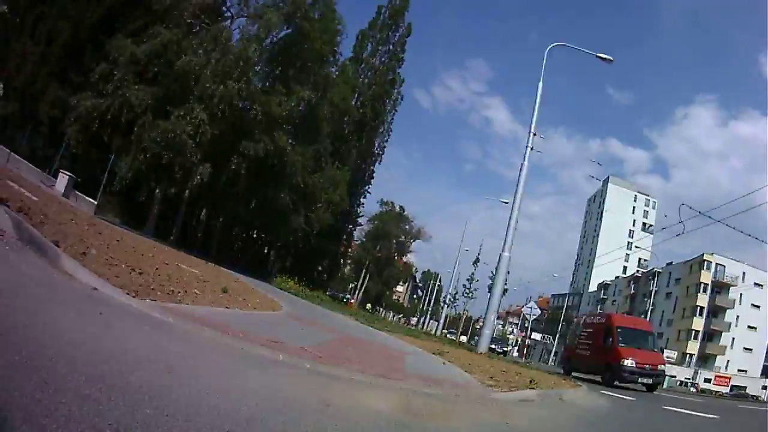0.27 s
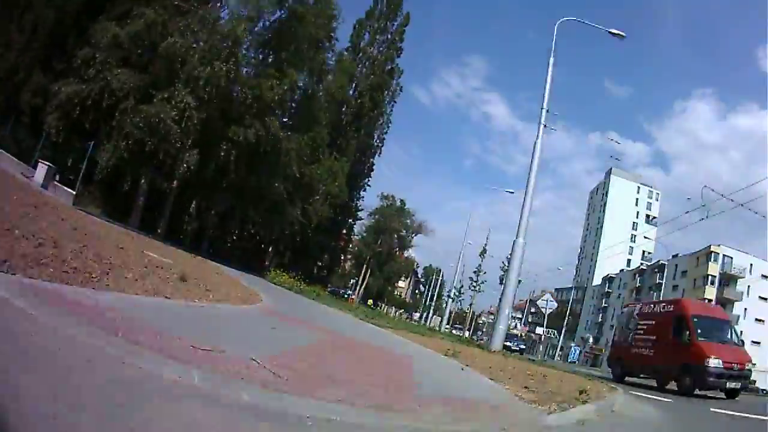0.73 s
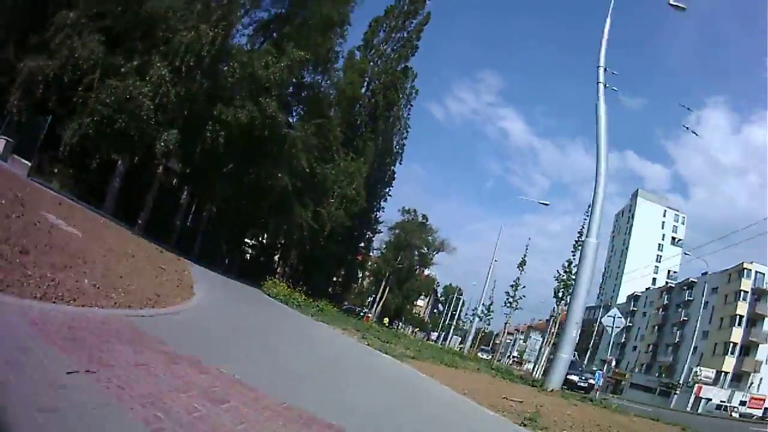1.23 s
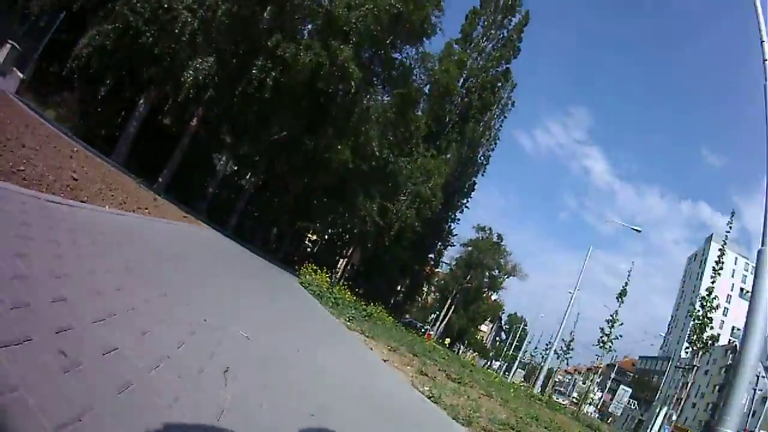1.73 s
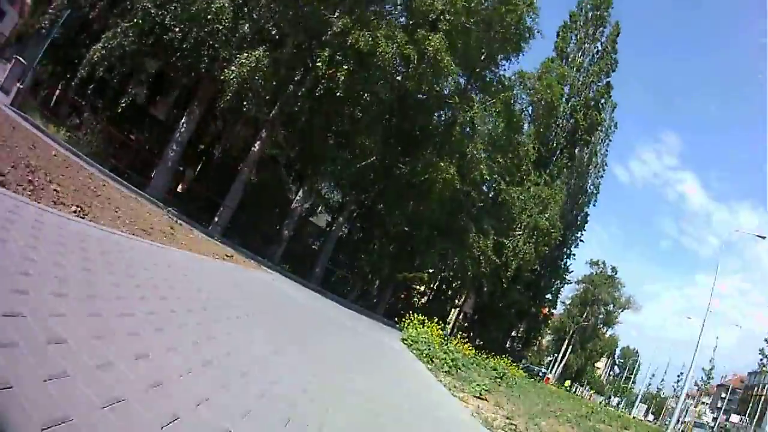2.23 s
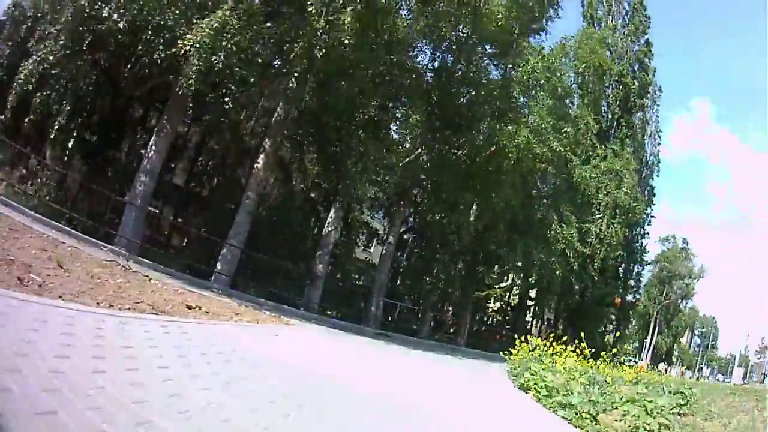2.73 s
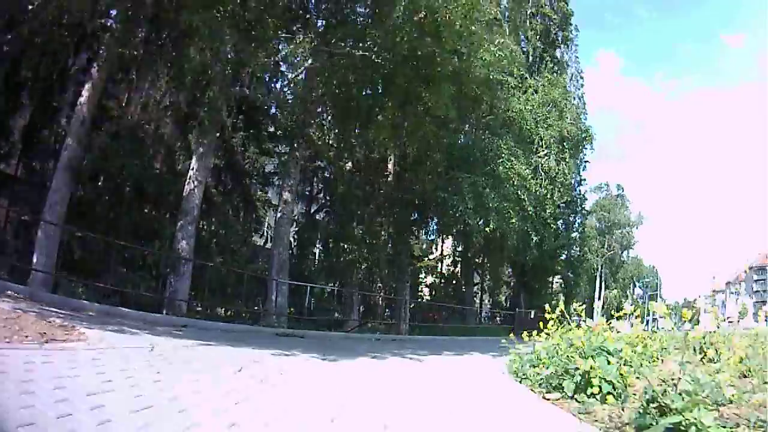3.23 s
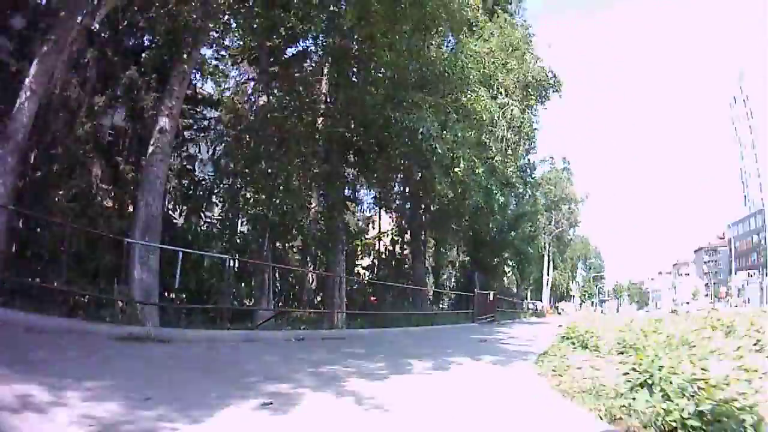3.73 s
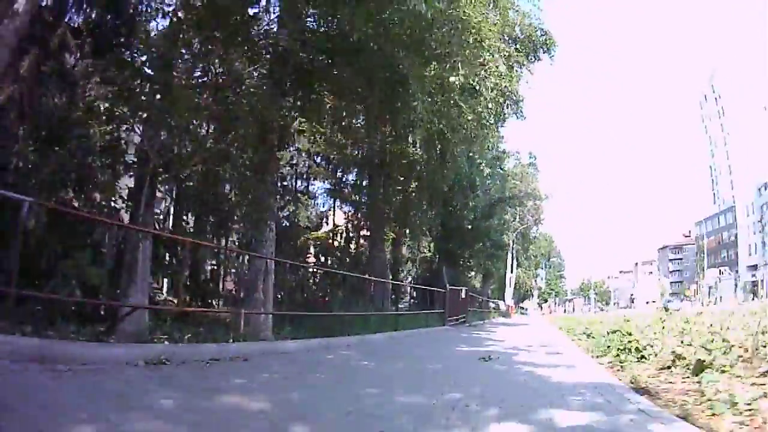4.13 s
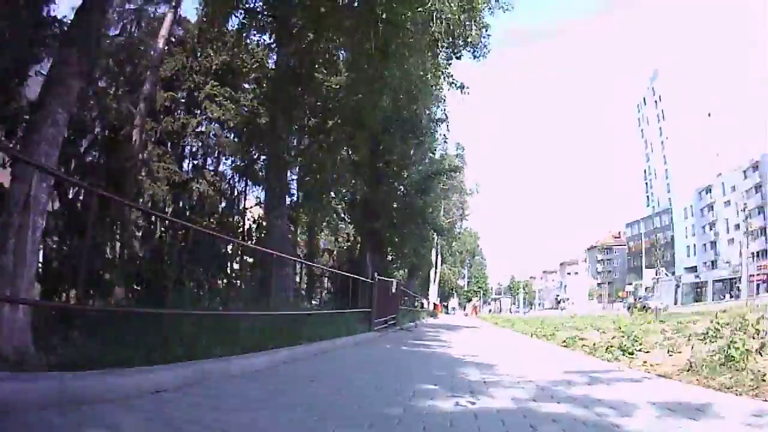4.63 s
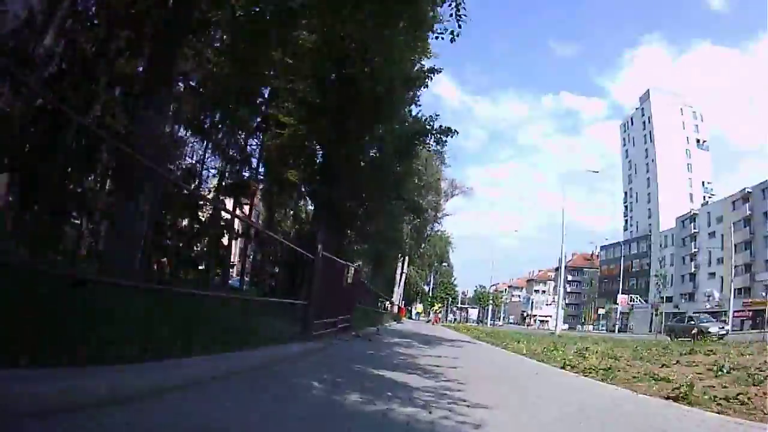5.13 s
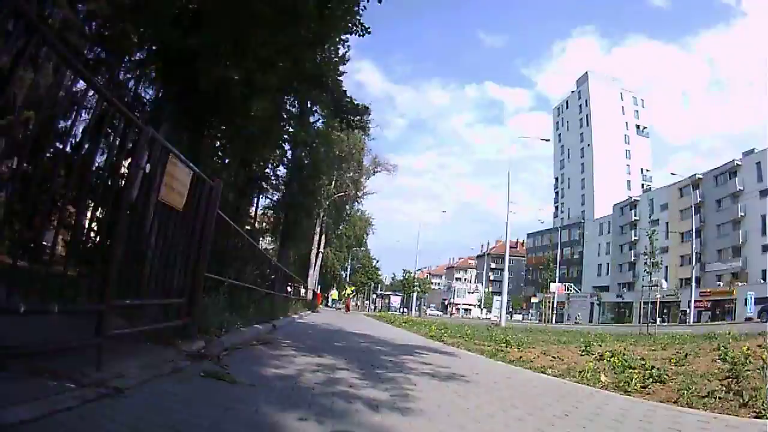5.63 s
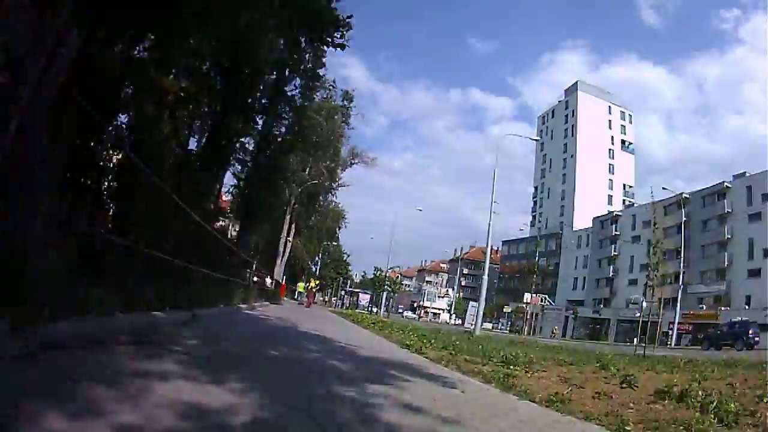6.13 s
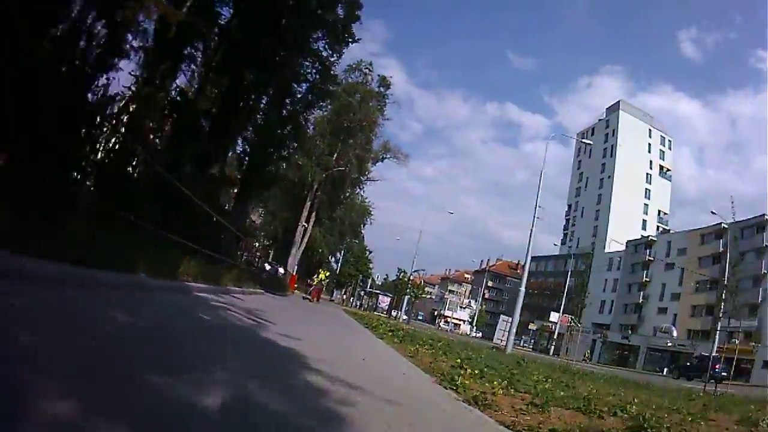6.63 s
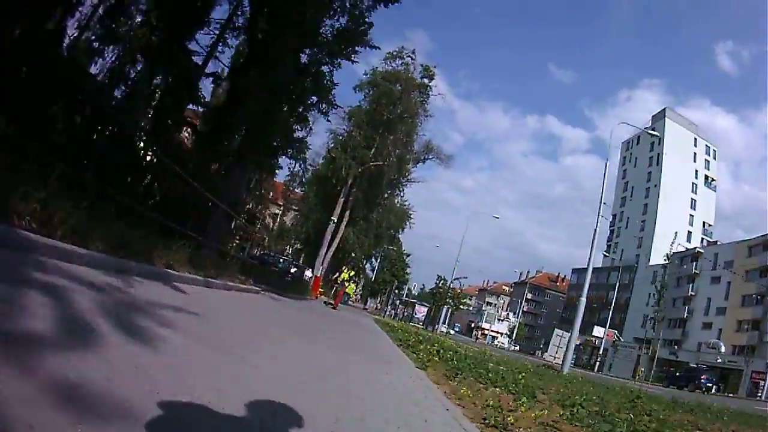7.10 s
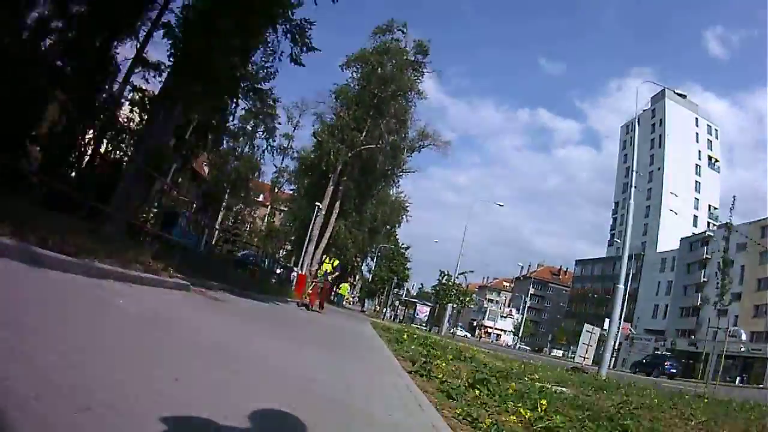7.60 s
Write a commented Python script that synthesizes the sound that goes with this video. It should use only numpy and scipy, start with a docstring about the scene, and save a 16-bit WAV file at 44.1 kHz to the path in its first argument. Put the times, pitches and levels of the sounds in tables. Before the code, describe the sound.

An electric skateboard rumbles over asphalt and paving, with hard clattering slams early and midway, tyre hiss in a bend, and knocks at joints.

```python
"""On asphalt and paving, an electric skateboard rolls past the joints, heard by a small microphone riding on it.
Road grain drums through wheels and deck as noise coloured by the board; the tyres hiss in a bend.
Kerbs and dips set the deck bouncing as bell-shaped bursts of its bending modes, and loose fittings chatter.
Joints knock and the board slams against its stops as short bursts of force through a resonant body.
The microphone is narrow-band, and the loudest blows overload it."""
import sys
import numpy as np
from scipy.fft import rfft, irfft, next_fast_len
from scipy.io import wavfile
from scipy.ndimage import map_coordinates

SR = 44100
rng = np.random.default_rng(int(sys.argv[2]) if len(sys.argv) > 2 else 0)


def put_to_file(sound):
    """Save the sound as 16-bit audio at rate SR, in the file named by the first command-line argument."""
    columns = np.atleast_2d(sound).T  # one column per channel
    safe = np.clip(columns, -1, 1)
    whole_steps = np.round(safe * 32767)
    wavfile.write(sys.argv[1], SR, whole_steps.astype(np.int16))


N = 346626  # length in samples


def amp(db):
    """Decibels to gain."""
    return 10 ** (np.asarray(db) / 20)


def unit(x):
    """x scaled to rms 1."""
    return x / np.sqrt(np.mean(x ** 2) + 1e-20)


def curves(rows):
    """One value per sample for each column after the time, joined by straight lines."""
    knot_s, *columns = np.transpose(rows)
    return [np.interp(np.arange(N) / SR, knot_s, column) for column in columns]


def wobble(rate):
    """A smooth random curve through rate knots a second."""
    knots = rng.standard_normal(int(N * rate / SR) + 4)
    return map_coordinates(knots, [np.arange(N) * rate / SR])


def swell(s, half):
    """A bell-shaped rise and fall around time s."""
    return np.exp(-((np.arange(N) / SR - s) / half) ** 2)


def swells(rows):
    """Level change in dB from rows of middle, half length and dB."""
    return sum(db * swell(s, half) for s, half, db in rows)


def coloured(x, points):
    """x through a causal, minimum-phase body with the given spectrum."""
    m = 2 * next_fast_len(len(x))
    hz, db = np.transpose(points)
    log_hz = np.log(np.fft.rfftfreq(m, 1 / SR) + 1)
    log_gain = np.log(amp(np.interp(log_hz, np.log(hz), db)))
    # folding the cepstrum onto positive times makes the body ring only after the force
    cepstrum = irfft(log_gain, m)
    cepstrum[1:m // 2] *= 2
    cepstrum[m // 2 + 1:] = 0
    body = np.exp(rfft(cepstrum))
    return irfft(rfft(x, m) * body, m)[:len(x)]


def low_pass(x, hz, order):
    """A steep low-pass without phase shift."""
    m = next_fast_len(N + SR // 2)
    loss = np.sqrt(1 + (np.fft.rfftfreq(m, 1 / SR) / hz) ** (2 * order))
    return irfft(rfft(x, m) / loss, m)[:N]


def add(track, s, sound):
    """Mix a sound into the track at time s."""
    part = track[max(round(s * SR), 0):][:len(sound)]
    part += sound[:len(part)]


def road(rate, spread_db, smooth):
    """Force on the wheels: rate stones a second of scattered size, over fine texture."""
    hits = rng.random(N) < rate / SR
    sizes = rng.standard_normal(N) * amp(spread_db * rng.standard_normal(N))
    return unit(unit(hits * sizes) + smooth * rng.standard_normal(N))


def contact(body, length, rise, push):
    """One blow: a clean push and a brief scatter of micro-contacts, through a body; rms 1 over its length."""
    t = np.arange(SR // 10) / SR
    force = rng.standard_normal(len(t)) * np.exp(-(t / length) ** 2) * (1 - np.exp(-t / rise))
    force /= np.linalg.norm(force)
    force[np.argmax(t > rise)] -= push
    blow = coloured(force, body)
    return blow / np.linalg.norm(blow) * np.sqrt(length * SR)


# Sharp click of wheel and grains, also used by crunch and knocks.
# Each row: frequency in Hz, relative level in dB per Hz.
CLICK_SPECTRUM = [(400, -8), (1000, 0.5), (2200, -0.5), (3000, 6.5), (3700, 5), (4300, -21)]
# Patches of loose grit. Each row: middle in seconds, half length in seconds, level in dB.
GRIT_PATCHES = [(1.125, 0.017, -49), (4.18, 0.098, -48), (7.612, 0.036, -54)]


def grit():
    """Single grains crack under the wheels at random as they run through loose grit."""
    amount = sum(amp(db) * swell(s, half) for s, half, db in GRIT_PATCHES)
    grains = road(rate=45, spread_db=2.4, smooth=.2)
    return amount * unit(coloured(grains, CLICK_SPECTRUM))


def crunch(sway, level_db):
    """Sand crackles under the wheels the harder the deck loads them."""
    load = np.abs(sway) ** 1.6
    sand = road(rate=320, spread_db=5.7, smooth=.15)
    return amp(level_db) * load * unit(coloured(sand, CLICK_SPECTRUM))


# Buzz of the loose fitting, also used by rattles.
# Each row: frequency in Hz, relative level in dB per Hz.
BUZZ_SPECTRUM = [(300, -13.5), (1000, -15.5), (1250, -3.5), (1450, 0.5), (1680, 3.5), (2000, -19),
                 (2350, -9.5), (2650, -28.5), (4000, -36.5)]


def chatter(sway, slack, level_db):
    """A loose fitting buzzes on each upswing that lifts it off its seat."""
    lift = np.tanh(np.maximum(sway / slack - 1, 0))
    looseness = amp(2.9 * wobble(5.4))  # the fitting shifts, so the buzzing comes in clumps
    buzz = unit(coloured(road(rate=1300, spread_db=4.1, smooth=0.3), BUZZ_SPECTRUM))
    return amp(level_db) * lift * looseness * buzz


BOUNCE_HZ = 43  # first bending mode of the loaded deck
# Bouts of tapping. Each row: first tap in seconds, length of the bout in seconds, level in dB before the trim.
RATTLE_BOUTS = [(0.575, .01, -24), (.644, .01, -21.5), (.7254, .01, -21), (1.281, .01, -13),
                (1.946, .06, -27), (2.118, .035, -26), (2.28, .01, -26), (2.348, .01, -26),
                (2.7545, .01, -21), (3.004, .01, -24), (3.0813, .035, -24.5), (3.207, .01, -19.5),
                (3.954, .01, -14.5), (4.026, .01, -16), (4.429, .06, -23), (4.801, .035, -24.5),
                (4.983, .035, -24), (5.584, .01, -18), (6.355, .035, -18.5), (6.9236, .035, -20.5),
                (7.0694, .01, -21), (7.1205, .06, -23.5), (7.19, .01, -20.5)]


def rattles():
    """Shaken hard, the loose fitting taps its seat at the deck's bounce rate."""
    track = np.zeros(N)
    for start, length, db in RATTLE_BOUTS:
        for s in start + np.arange(0, length, 1 / BOUNCE_HZ):
            tap = contact(BUZZ_SPECTRUM, length=0.0052, rise=.0009, push=.2)
            add(track, s, amp(db - 6) * tap)
    return track


BEND_S, BEND_HALF_S = 2.88, 0.81  # middle and half length of the bend on the paving blocks
# Tyre hiss. Each row: frequency in Hz, relative level in dB per Hz.
TYRE_SPECTRUM = [(1500, -32.5), (2700, -18), (3100, -6.5), (3500, 3), (3850, -8.5), (4300, -11)]


def tyre_hiss(change_db, patches):
    """The tyres hiss over the surface and scrub louder in the bend."""
    scrub_db = 15.5 * swell(BEND_S, BEND_HALF_S)
    hiss_db = -63.5 + scrub_db + .4 * change_db + 1.2 * patches
    return amp(hiss_db) * unit(coloured(road(rate=330, spread_db=3.1, smooth=1.5), TYRE_SPECTRUM))


# Fine road grain through the board. Each row: frequency in Hz, relative level in dB per Hz.
GRAIN_SPECTRUM = [(500, -18), (900, -7.5), (1100, -1), (1210, 4.5), (1400, -7), (1690, 1), (1820, -10.5),
                  (1980, -13), (2350, -19.5), (2650, -28.5), (4000, -36)]


def road_grain(mean_db, change_db, patches):
    """Fine stones ring the trucks, flickering with the surface."""
    # .85 dB of grain per dB of drive
    grain_db = mean_db - 13 + .85 * change_db + 1.6 * patches + 2 * wobble(130)
    return amp(grain_db) * unit(coloured(road(rate=900, spread_db=3.3, smooth=.7), GRAIN_SPECTRUM))


# Wheel roar through the board. Each row: frequency in Hz, relative level in dB per Hz.
ROAR_SPECTRUM = [(70, -6.5), (130, -6), (220, -6.5), (290, -9), (360, -0.5), (420, 5), (470, -1.5),
                 (540, -0.5), (660, -6.5), (800, -10.5), (1000, -21.5), (1500, -28), (2600, -60)]


def wheel_roar(mean_db, change_db, patches):
    """Coarse stones drum through wheels and deck as a low roar."""
    roar_db = mean_db + 1.5 + change_db + .5 * patches
    return amp(roar_db) * unit(coloured(road(rate=2000, spread_db=2.5, smooth=.8), ROAR_SPECTRUM))


# How hard speed and surface drive the wheels. Each row: time in seconds, drive in dB.
WHEEL_DRIVE = [(0.0, -26), (1.33, -28.5), (1.55, -30.5), (3.9, -29), (4.18, -30.5), (4.51, -27.5),
               (4.86, -30), (7.49, -25.5), (7.86, -26)]
# Smoother and rougher pavement. Each row: middle in seconds, half length in seconds, change of drive in dB.
PAVEMENT_STRETCHES = [(2.42, 0.044, -2), (4.12, 0.091, -3.5), (4.39, 0.085, 7), (6.2, 0.046, 5),
                      (6.43, 0.04, 2.5)]


def rolling():
    """Roar, grain and hiss follow one drive, raised on rough stretches and where bumps press the wheels down."""
    drive_db, = curves(WHEEL_DRIVE)
    mean_db = drive_db.mean()
    jolt_db = 6 * jolts()
    change_db = drive_db - mean_db + swells(PAVEMENT_STRETCHES) + jolt_db
    patches = wobble(60)  # rough and smooth spots pass under the wheels
    roar = wheel_roar(mean_db, change_db, patches)
    grain = road_grain(mean_db, change_db, patches)
    return roar + grain + tyre_hiss(change_db, patches)


# Kerbs and dips, also played by deck.
# Each row: deepest flex in seconds, peak level of the first mode in dB, half length in seconds.
DECK_BUMPS = [(1.142, -10.5, .023), (1.333, -4.5, 0.037), (1.737, -10, 0.028), (1.909, -7, 0.032),
              (2.239, -24.5, .03), (3.221, -18.5, 0.013), (5.531, -10.5, 0.047), (5.625, -7, 0.036),
              (5.694, -15, .05), (6.388, -16.5, .047), (6.966, -19, 0.05), (7.73, -17, .022)]


def jolts():
    """How hard the bumps press the wheels down, 1 at full scale."""
    return sum(amp(db) * swell(s, 2 * half) for s, db, half in DECK_BUMPS)


# Flexing of the deck. Each row: frequency in Hz, relative level in dB per Hz.
FLEX_SPECTRUM = [(12, -18), (24, -7), (35, 3.5), (55, -2), (68, -2), (90, -15), (125, -13), (170, -21.5),
                 (400, -59.5)]
# The deck settles on level ground. Each row: middle in seconds, half length in seconds, change of sway in dB.
SWAY_LULLS = [(.3, 0.92, -3), (1.52, .1, -10), (4.75, 0.16, -3), (7.4, 0.18, -6.5)]


def deck():
    """The springy deck sways all the time and bounces around each bump."""
    sway_db = -26.5 + swells(SWAY_LULLS)
    sway = amp(sway_db) * unit(coloured(rng.standard_normal(N), FLEX_SPECTRUM))
    t = np.arange(N) / SR
    for s, db, half in DECK_BUMPS:
        phase = 2 * np.pi * BOUNCE_HZ * (t - s)
        bending = np.cos(phase) + amp(-16) * np.sin(2.85 * phase)  # first and second bending modes
        sway -= amp(db) * swell(s, half) * bending
    return sway


def truck_ring(hz, length):
    """The axle swells into a few clean cycles as a wheel rolls over an edge."""
    t = np.arange(SR // 20) / SR
    pitch = hz * (1 + 0.12 * rng.standard_normal())  # shifts with the load on the wheel
    envelope = t / length * np.exp(1 - t / length)
    return envelope * np.sin(2 * np.pi * pitch * t)


# Thud through the deck. Each row: frequency in Hz, relative level in dB per Hz.
THUD_SPECTRUM = [(60, 2), (130, 3), (200, -17), (340, 1.5), (520, -2.5), (1000, -4), (1300, -19.5),
                 (1800, -18), (2300, -38.5), (4000, -36)]
# Joints and edges. Each row: start in seconds, thud and ring level in dB, click level in dB, all before trims.
JOINT_KNOCKS = [(1.696, -14.5, -38), (1.724, -17.5, -35.5), (1.735, -14.5, -45), (1.746, -18, -44.5),
                (2.237, -21, -49), (2.644, -16.5, -50), (3.05, -16, -44.5), (3.786, -16, -46),
                (4.32, -14, -37.5), (4.414, -15, -45), (5.438, -24, -67), (5.474, -19, -41),
                (5.48, -12, -36), (5.506, -15.5, -46), (5.528, -15, -40), (5.598, -12.5, -40),
                (5.667, -16, -56), (5.684, -14, -38.5), (5.789, -18.5, -51), (6.171, -23.5, -63),
                (6.969, -15.5, -53), (7.036, -10, -32.5), (7.559, -17.5, -52), (7.726, -26, -44.5)]


def knocks():
    """A joint in the path rings the axle, thuds through the deck and clicks at the wheel."""
    track = np.zeros(N)
    for s, thud_db, click_db in JOINT_KNOCKS:
        ring = truck_ring(hz=390, length=0.0024)
        thud = contact(THUD_SPECTRUM, length=0.0051, rise=.0012, push=0.15)
        click = contact(CLICK_SPECTRUM, length=.004, rise=.0015, push=0.55)
        add(track, s, amp(thud_db - 1.5) * ring)
        add(track, s, amp(thud_db - 4.0) * thud)
        add(track, s, amp(click_db + 5) * click)
    return track


# Crash of the board on its stops. Each row: frequency in Hz, relative level in dB per Hz.
CRASH_SPECTRUM = [(120, 3.5), (400, -5.5), (650, 3.5), (950, 6), (1300, 2.5), (1800, 5), (2100, 0.5),
                  (2400, -10), (3700, -10), (4300, -16)]
# Thump of the rubber bushings. Each row: frequency in Hz, relative level in dB per Hz.
THUMP_SPECTRUM = [(50, -5.5), (110, 8.5), (180, -1.5), (280, 1.5), (370, 5), (550, -12), (1200, -39)]
# Slams against the stops. Each row: start in seconds, crash level in dB before the trim, length in seconds.
BOARD_SLAMS = [(1.1643, -4, 0.0037), (1.1695, -10, 0.004), (1.295, -23, .005), (1.302, -17, 0.01),
               (1.312, -9.5, 0.0058), (1.321, -2, 0.0039), (1.3277, -0.5, .0035), (1.338, -8, .0038),
               (1.7102, -15.5, 0.0059), (1.8801, -1.5, .0035), (1.891, -13, 0.0049),
               (1.9052, -12.5, 0.0039), (5.6204, -2.5, 0.0057), (5.6436, -8, 0.0052)]


def slams():
    """The board bottoms out with a crash and a thump."""
    track = np.zeros(N)
    for s, db, length in BOARD_SLAMS:
        crash = contact(CRASH_SPECTRUM, length=length, rise=0.00028, push=0.252)
        thump = contact(THUMP_SPECTRUM, length=0.012, rise=0.00073, push=0.48)
        add(track, s, amp(db - 2.0) * crash)
        # the bushings bottom out with much the same thump however hard the slam
        add(track, s, amp(-14.5) * thump)
    return track


def scene():
    """Everything reaches the microphone through the board, with no room around it."""
    sway = deck()
    # the loose fitting chatters more on the blocks in the bend and on bumps
    shaking = amp(3.5 * swell(BEND_S, BEND_HALF_S) + 8 * jolts())
    buzzing = shaking * chatter(sway, slack=0.043, level_db=-39.5)
    small_parts = buzzing + crunch(sway, level_db=-28.5) + grit()
    return (rolling() + sway + small_parts + slams() + knocks() + rattles())[None]


def record(dry):
    """The microphone is narrow-band; loud blows clip after it and spit treble."""
    narrow = low_pass(dry[0], 4066, order=36)  # upper edge of the microphone's band in Hz
    ceiling = .72  # of full scale
    clipped = narrow / (1 + np.abs(narrow / ceiling) ** 16) ** (1 / 16)
    return low_pass(clipped, 15700, order=60)[None]  # top of the spat treble in Hz


dry = scene()
out = record(dry)
put_to_file(out)
```